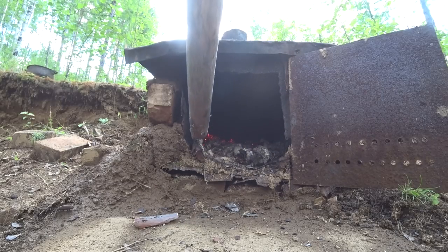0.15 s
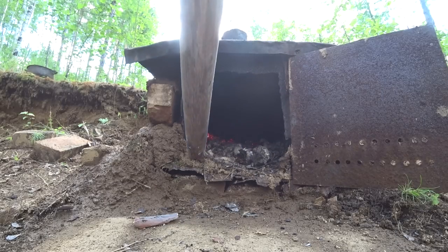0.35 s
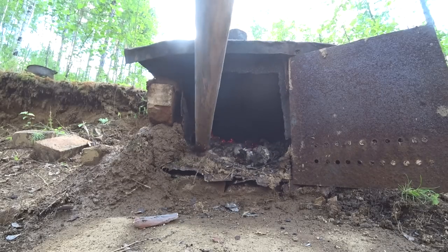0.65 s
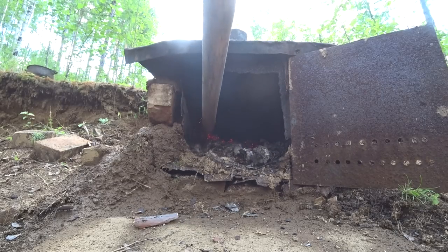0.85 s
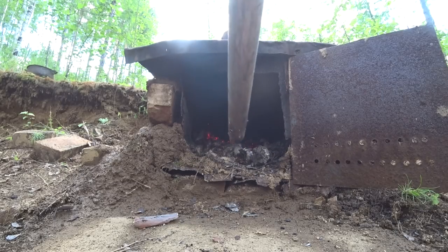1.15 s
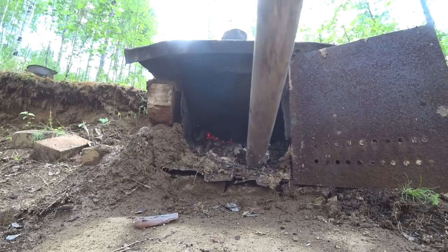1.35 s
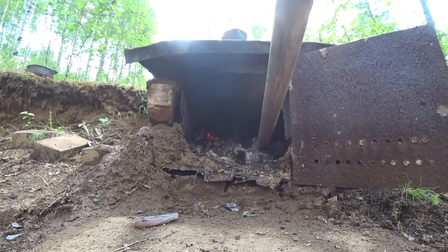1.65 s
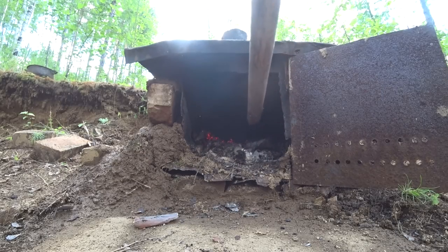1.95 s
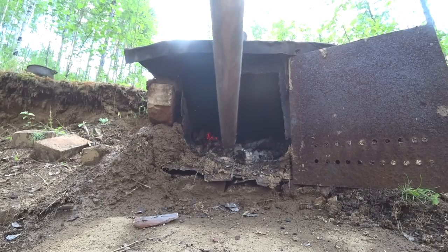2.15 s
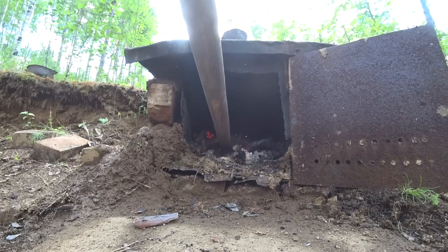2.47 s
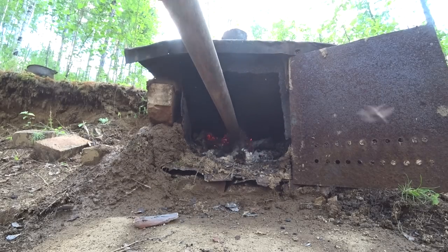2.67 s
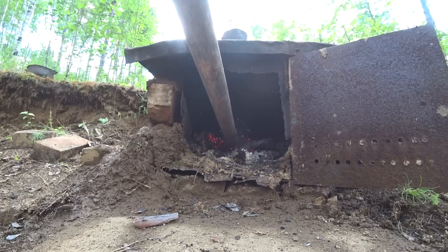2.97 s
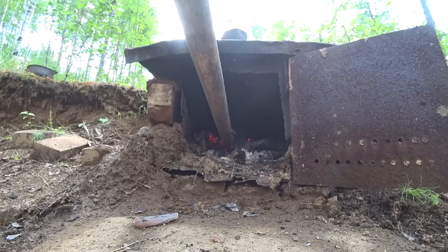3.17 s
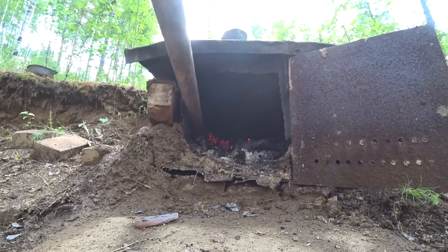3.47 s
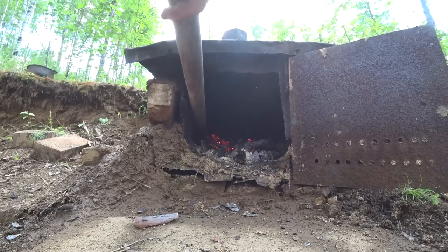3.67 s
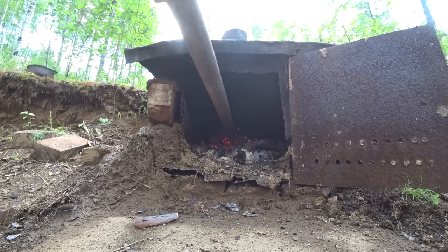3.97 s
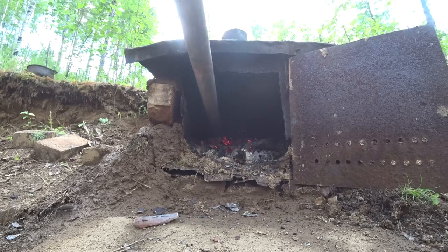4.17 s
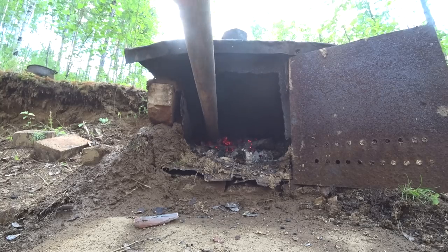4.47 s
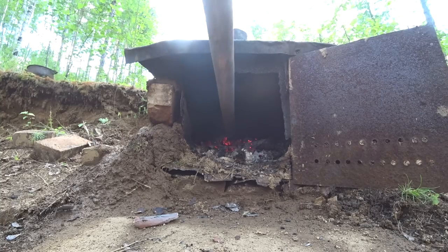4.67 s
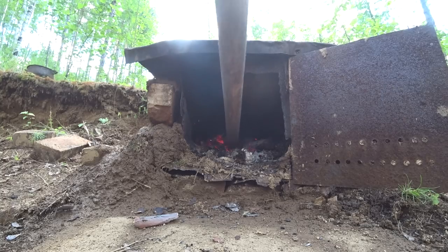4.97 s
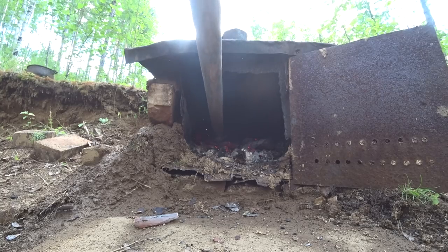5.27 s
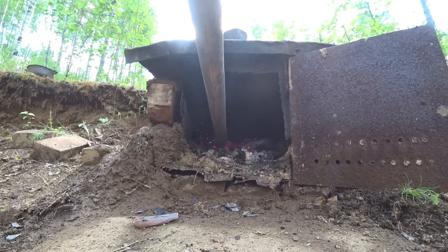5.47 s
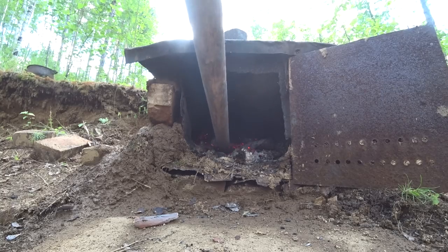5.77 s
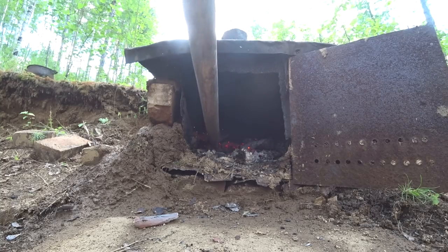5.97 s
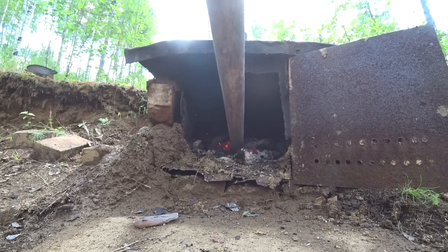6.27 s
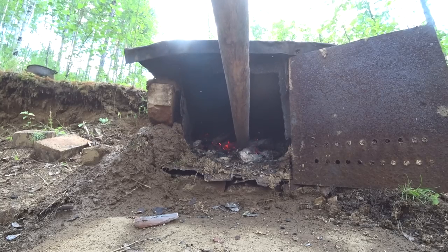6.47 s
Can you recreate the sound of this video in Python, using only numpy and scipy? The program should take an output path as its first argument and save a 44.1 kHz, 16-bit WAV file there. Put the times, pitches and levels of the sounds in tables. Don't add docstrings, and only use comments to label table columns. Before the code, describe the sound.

Close to an outdoor metal firebox, a wooden pole stirs charcoal. An early cluster of bright crunches gives way to lighter scraping, then a heavy jab thuds at about three and a half seconds. Dry snaps and ticks thicken afterwards, with more knocks and grit. A fly hums near the microphone before three seconds and again at the end, over quiet forest air.

```python
import sys
import numpy as np
from scipy import signal
from scipy.fft import rfft, irfft, next_fast_len
from scipy.io import wavfile
from scipy.ndimage import uniform_filter1d

SR = 44100
rng = np.random.default_rng(int(sys.argv[2]) if len(sys.argv) > 2 else 0)


def persist_wave(psi):
    counts = np.round(np.clip(psi, -1, 1) * 32767).astype(np.int16)
    wavfile.write(sys.argv[1], SR, np.atleast_2d(counts).T)


def gain_from_db(level_db):
    decades = np.asarray(level_db, float) / 20
    return 10 ** decades


N = 291942


def evened(x):
    return x / np.sqrt(np.mean(x ** 2) + 1e-20)


def peaked(x):
    return x / abs(x).max()


def read(points, hz):
    f, value = np.transpose(points)
    return np.interp(np.log(hz + 1), np.log(f + 1), value)


def add(mix, s, sound):
    part = mix[..., max(round(s * SR), 0):][..., :sound.shape[-1]]
    part += sound[..., :part.shape[-1]]


def colour(x, points):
    size = next_fast_len(N)
    gain = gain_from_db(read(points, np.fft.rfftfreq(size, 1 / SR)))
    return irfft(rfft(x, size) * gain, size)[:N]


def resonate(x, hz, width):
    hz = min(hz, 0.45 * SR)
    return signal.lfilter(*signal.iirpeak(hz, max(hz / width, 0.3), SR), x)


def body(x, modes):
    return evened(sum(gain_from_db(db) * resonate(x, hz, width) for hz, width, db in modes))


def puff(rise_s, t60):
    t = np.arange(5000) / SR
    return rng.standard_normal(5000) * (1 - np.exp(-t / rise_s)) * gain_from_db(-60 * t / max(t60, 0.004))


# pitch_hz, level_db (per Hz)
AIR_COLOUR = [(12, -30), (20, -3.5), (119, -16.5), (147, -16.5), (461, -15.5), (705, -18.5), (1450, -19.5),
              (2040, -27), (7720, -36), (11500, -39.5), (15000, -77), (22000, -120)]
# pitch_hz, likeness (-1 to 1)
AIR_LIKENESS = [(60, 0.99), (170, -0.056), (500, -0.71), (1420, -0.68), (4090, -0.42), (11800, 0.29)]


def air():
    level_db, gust_db, gust_below_hz = -55, 3.3, 60
    frames, hz = N // 256 + 5, np.fft.rfftfreq(1024, 1 / SR)
    a, b, c, d, patches = rng.standard_normal((frames, 513, 5)).T
    patches = evened(uniform_filter1d(uniform_filter1d(patches, 14, 0), 12, 1))
    same = np.clip(read(AIR_LIKENESS, hz), -1, 1)[:, None]
    left = a + 1j * b
    right = same * left + np.sqrt(1 - same ** 2) * (c + 1j * d)
    gusts = evened(uniform_filter1d(rng.standard_normal(frames), size=30))
    wind_db = gust_db * gusts / (1 + (hz[:, None] / gust_below_hz) ** 2)
    z = np.array([left, right]) * gain_from_db(read(AIR_COLOUR, hz)[:, None] + patches + wind_db)
    return gain_from_db(level_db) * evened(signal.istft(z, nperseg=1024, noverlap=768)[1][:, :N])


def insects():
    pitch_hz, width_hz, level_db = 7600, 520, -72
    own, shared = rng.standard_normal((2, N)), rng.standard_normal(N)
    once = resonate(own + shared, pitch_hz, width_hz)
    return gain_from_db(level_db) * evened(resonate(once, pitch_hz, width_hz))


# start_s, peak_db, pitch_hz,
# dull_under_bright_db
TICKS = [(0.0443, -38.5, 5900, -9), (0.272, -41, 6980, -22), (1.1173, -38.5, 3390, -12),
         (1.254, -34.5, 7040, -22), (1.4234, -42, 8080, -5), (1.5853, -38, 7220, -24),
         (1.6252, -33.5, 7700, -11), (1.9405, -36.5, 6840, -22), (1.9759, -34, 6030, -18),
         (2.002, -40, 7850, -25), (2.0453, -32.5, 6840, -27), (2.0583, -38, 7730, -26),
         (2.094, -43, 7100, -21), (2.2174, -43, 6920, -3), (2.9654, -33.5, 7800, -30),
         (3, -47, 7410, -21), (3.0054, -29, 6680, -26), (3.0679, -28, 10500, -25.5),
         (3.0827, -35, 7740, -20), (3.1137, -32, 7200, -22), (3.175, -33, 6450, -31),
         (3.209, -31.5, 6800, -28), (3.237, -35, 7010, -20), (3.2458, -31, 4100, -21),
         (3.258, -28, 6710, -15), (3.276, -28, 6760, -11), (3.2917, -29.5, 9200, -10),
         (3.3275, -38, 7740, -19), (3.345, -41.5, 9710, -24.5), (3.3818, -42, 7470, -17),
         (3.4022, -38.5, 7390, -22), (3.4241, -29.5, 6080, -29), (3.455, -35, 6800, -14),
              (4.171, -38, 7940, -26), (4.1885, -34.5, 6560, -29), (4.477, -22.5, 7170, -28),
              (4.6743, -32, 7870, -22), (4.6905, -25.5, 8100, -24), (4.802, -32, 8050, -30),
              (4.8302, -30.5, 6270, -22), (5.0893, -27, 6330, -29), (5.1791, -31.5, 8300, -33),
              (5.2021, -30.5, 9780, -27), (5.3998, -33, 8390, -25), (5.4085, -30, 8160, -16),
              (5.4267, -28, 7740, -18), (5.537, -46, 7840, -16), (5.5834, -35.5, 8000, -18),
              (5.6106, -44, 7910, -22), (5.6217, -42, 6170, -17), (5.6456, -36, 6150, -19),
              (6.0174, -34.5, 7490, -21), (6.08, -36, 7700, -24), (6.1649, -33, 8450, -9)]
# start_s, peak_db, pitch_hz, t60_s
BREAKS = [(0.4897, -31, 4700, 0.037), (0.579, -23.5, 7000, 0.037), (0.653, -22, 6820, 0.021),
            (0.7028, -14.5, 6040, 0.027), (0.8809, -33.5, 7400, 0.04), (0.891, -31, 4280, 0.025),
            (0.9216, -36, 5150, 0.055), (1.457, -32.5, 7600, 0.029), (1.5426, -31, 7140, 0.032),
            (1.6708, -25.5, 7500, 0.031), (1.7593, -22.5, 7100, 0.023), (2.5356, -28.5, 7600, 0.043),
            (3.5079, -13.5, 3380, 0.04), (3.6056, -14, 6100, 0.022), (3.743, -19, 5800, 0.023),
            (4.2651, -16, 6540, 0.032), (4.4378, -31, 7300, 0.027), (4.5424, -32, 7390, 0.037),
            (4.923, -21, 3730, 0.048), (5.015, -21, 7700, 0.018), (5.1012, -32, 7300, 0.091),
            (5.3488, -24.5, 5440, 0.03), (5.359, -17, 3670, 0.039), (5.8502, -21, 7250, 0.025),
            (5.866, -23.5, 7600, 0.038), (6.179, -31.5, 4300, 0.054), (6.375, -34, 7500, 0.024),
            (6.5942, -26.5, 4130, 0.018), (0.5346, -30.5, 7350, 0.038), (.611, -32, 6500, .02),
            (.6884, -23, 6860, .02), (0.6948, -15.5, 8030, 0.025), (0.711, -16.5, 9600, .04),
            (.737, -24, 8160, 0.046), (0.7694, -22.5, 7580, 0.024), (.787, -25.5, 8050, 0.038),
            (.8, -30, 7550, 0.042), (2.234, -30, 6000, .04), (3.5514, -26, 7390, .015),
            (3.5745, -20.5, 8440, 0.032), (3.616, -28, 7500, .04), (3.652, -35, 7000, 0.023),
            (3.771, -28, 6000, .02), (3.7906, -19.5, 6340, .03), (3.819, -24, 8500, 0.035),
            (3.846, -21, 7000, .04), (3.862, -22, 7500, .04),
            (2.2805, -24, 7000, 0.0096), (2.909, -31.5, 6000, .03), (3.031, -34, 6500, .09),
          (3.165, -42, 6000, 0.027), (3.215, -36, 6000, 0.022), (3.6098, -19, 6000, .015),
          (4.247, -28, 7300, 0.018), (5.9955, -22, 3550, 0.013), (6.502, -23, 3500, 0.012),
          (1.45, -40, 3400, .04), (1.506, -35, 3400, .04), (1.694, -40, 5000, .02), (1.717, -36, 4500, .03),
          (1.775, -35, 4200, .04), (2.949, -31, 6500, .012), (4.235, -42, 5500, .02),
          (4.257, -25, 7000, .05), (4.277, -24, 5500, .02), (4.45, -29, 7500, .015),
          (4.64, -40, 7000, .015), (5.678, -40, 6000, .02), (5.72, -32, 6500, .04),
          (5.838, -31, 9000, .015), (5.975, -37, 5000, .015)]
# start_s, peak_db, pitch_hz, t60_s, dull_under_bright_db
SNAPS = [(1.518, -24, 5050, 0.0089, -17), (2.273, -19, 9280, 0.0098, -21), (2.5927, -17, 6300, 0.01, -32),
         (2.6444, -23.5, 7370, 0.012, -21), (2.7472, -23.5, 6100, 0.01, -31),
         (2.927, -18.5, 7500, 0.012, -18), (2.9567, -23, 7790, 0.011, -31), (3.026, -20, 6680, 0.0098, -20),
         (3.197, -22.5, 6330, 0.0081, -27), (3.482, -23.5, 6800, 0.013, -17),
         (3.907, -20, 5900, 0.0084, -22), (3.9629, -23.5, 6650, 0.0067, -30),
         (4.0478, -22.5, 9850, 0.0065, -18), (4.0758, -23.5, 5950, 0.014, -14),
         (4.134, -18.5, 8500, 0.012, -19), (4.289, -19.5, 8080, 0.0093, -36),
         (4.317, -27, 7140, 0.015, -24), (4.3615, -15, 7800, 0.013, -30),
         (4.5014, -23.5, 10200, 0.013, -31), (4.5931, -16.5, 8300, 0.01, -36),
         (4.6085, -26.5, 6910, 0.014, -25), (5.2492, -23.5, 10900, 0.014, -28),
         (5.3134, -14.5, 8200, 0.015, -17.5), (5.3718, -21, 6470, 0.011, -13),
         (5.702, -18.5, 6600, 0.01, -20), (5.9947, -9.5, 8650, 0.013, -22.5),
         (6.4253, -26.5, 10800, 0.012, -22), (6.5024, -13.5, 6550, 0.01, -31),
         (6.552, -28.5, 8250, 0.016, -24)]


def coals():
    tick_t60_s, tick_spread, breaks_dull_db = 0.013, 0.13, -16.5
    ticks = TICKS
    chance = np.exp(tick_spread * rng.standard_normal(len(ticks)).clip(-2, 2))
    small = [(s, db, hz, tick_t60_s * b ** 2, dull_db) for (s, db, hz, dull_db), b in zip(ticks, chance)]
    breaks = [(*row, breaks_dull_db) for row in BREAKS]
    return breaks + SNAPS + small


def crackles():
    out = np.zeros((2, N))
    for s, db, hz, t60, dull_db in coals():
        steps = np.repeat(rng.standard_normal(250), 20)
        splinters = gain_from_db(3.5 * rng.standard_normal(5000) + 1.92 * steps)
        snap = splinters * puff(0.17 * t60, t60) + 0.068 * puff(0.0018, 0.019)
        snap[30:] += 1.6 * (0.012 / t60) ** 2 * puff(0.0002, 0.0045)[:-30]
        bright_hz = 3700 * gain_from_db(rng.normal(0, 0.56))
        bright = signal.lfilter(*signal.butter(3, bright_hz, "high", fs=SR), snap)
        dull = signal.lfilter(*signal.butter(2, [1100, 3200], "band", fs=SR), snap)
        pitched = 1.3 * bright + 2.38 * resonate(bright, hz, 0.18 * hz)
        sound = peaked(pitched) + gain_from_db(dull_db - 2.5) * peaked(dull)
        pan_db = rng.normal(1.0, 0.89)
        add(out, s, gain_from_db(db + np.array([[pan_db], [-pan_db]]) / 2) * sound)
    return out


# pitch_hz, width_hz, level_db
RING = [(440, 980, -1.5), (538, 115, -1.5), (1040, 30, 0.5), (1150, 300, -6), (1623, 99, 1),
        (2250, 330, 1.5), (2800, 500, 3.5), (3740, 90, -31)]
# start_s, peak_db, pitch_hz, t60_s
KNOCKS = [(.49, -36, 1060, 0.01), (0.658, -36.5, 1370, 0.025), (0.704, -31.5, 1390, 0.024),
          (.889, -31.5, 1854, 0.022), (1.462, -28.5, 1004, .022), (1.463, -32.5, 540, 0.028),
          (4.254, -44.5, 896, 0.043), (4.256, -38, 1410, .03), (1.544, -38, 423, 0.033),
          (1.653, -42.5, 423, 0.12), (1.761, -33.5, 410, 0.036), (2.238, -33, 2330, 0.043),
          (2.249, -33, 1010, 0.076), (3.51, -35, 464, 0.039), (3.791, -36.5, 750, 0.038),
          (3.84, -31.5, 1040, 0.074), (4.075, -45.5, 800, 0.032), (4.257, -37, 440, .04),
          (4.469, -44, 420, 0.043), (4.495, -38.5, 520, 0.026), (4.903, -39.5, 1150, 0.16),
          (4.922, -30, 1650, 0.057), (4.979, -37, 2280, 0.042), (5.35, -28.5, 606, 0.071),
          (5.36, -22, 2300, 0.033), (5.419, -40, 1710, 0.03), (5.69, -36, 1085, 0.044),
          (5.723, -35, 1106, 0.042), (5.95, -43, 904, 0.057), (5.965, -41, 1100, 0.049),
          (6.182, -30.5, 1085, 0.031), (6.593, -39.5, 432, 0.047), (2.233, -38, 1074, 0.044),
          (2.236, -36, 554, 0.066), (2.24, -35, 1610, 0.049), (2.249, -29.5, 2600, .03),
          (2.291, -36, 2610, .03), (2.393, -40, 2540, 0.029), (2.415, -39, 2250, 0.033),
          (2.467, -42, 2410, .025), (2.528, -37.5, 2770, 0.043), (2.56, -36, 2640, 0.034),
          (5.352, -27, 1770, 0.022), (5.35, -33, 1120, 0.041), (6.15, -49, 590, 0.05),
          (6.184, -40, 606, 0.055), (6.185, -38.5, 1710, 0.04), (6.208, -41, 430, .03),
          (6.502, -40.5, 1800, 0.02), (.672, -39, 330, 0.027)]
# start_s, peak_db, pitch_hz
THUMPS = [(0.489, -40, 206), (0.66, -43, 110), (1.462, -34.5, 211), (1.653, -37, 130), (1.718, -43, 230),
          (1.761, -38.5, 166), (2.255, -49, 67.4), (3.51, -16.5, 137), (3.511, -25, 282), (3.79, -36, 152),
          (3.841, -33.5, 149), (4.074, -45.5, 118), (4.259, -33, 106), (4.252, -39, 290), (4.468, -38, 110),
          (4.495, -51, 290), (4.904, -42.5, 240), (4.976, -45, 96), (5.204, -48, 294), (5.35, -30.5, 147),
          (5.362, -29.5, 310), (5.721, -40, 112), (5.947, -44.5, 193), (6.2, -49, 74), (6.596, -45, 111)]


def knocks():
    thump_cycles = 10
    out, t = np.zeros(N), np.arange(5000) / SR
    for s, db, hz, t60 in KNOCKS:
        blow = puff(0.0055, t60)
        swell = (1 - np.exp(-t / 0.00096)) ** 2
        note = np.sin(2 * np.pi * hz * t) * swell * gain_from_db(-60 * t / max(t60, 0.01))
        dull = signal.lfilter(*signal.butter(3, 1.3 * hz + 500, fs=SR), blow)
        clack = 0.56 * peaked(note) + 0.08 * peaked(dull) + 0.3 * peaked(body(dull, RING))
        add(out, s - 0.001, gain_from_db(db) * peaked(clack))
    for s, db, hz in THUMPS:
        push = np.sin(2 * np.pi * hz * t) * (1 - np.exp(-t / 0.0035)) * gain_from_db(-60 * t * hz / thump_cycles)
        add(out, s - 0.001, gain_from_db(db) * peaked(push))
    return out


# full_pressure_s, hold_s, grit_db, ring_over_grit_db, thud_over_grit_db
DRAGS = [(0.532, 0.13, -47, -2, -8), (0.703, 0.0042, -34.5, -8.5, -5.5), (0.791, 0.016, -43, -13.5, -6),
         (0.832, 0.066, -53.5, -13, -2), (1.48, 0.061, -50, 0.5, -2.5), (1.67, 0.0043, -49, -3, 2.5),
         (1.765, 0.019, -49, -8.5, -3), (2.264, 0.32, -47.5, -1.5, -3.5), (2.627, 0.28, -52.5, -25, -6),
         (3.046, 0.02, -52, -4, -5), (3.198, .01, -58.5, -4.5, -13), (3.588, 0.32, -40.5, -13.5, -1.5),
         (3.605, 0.013, -35, -27, -23), (3.81, 0.074, -35.5, -8.5, -10), (4.44, 0.047, -43.5, -8, -6.5),
         (5.229, 0.012, -49.5, -26, 0.5), (5.715, .015, -48, -2, -3), (5.797, 0.022, -46.5, -1.5, -5),
         (5.844, 0.066, -44.5, -9.5, -5.5), (5.91, 0.03, -47, -2, -8), (6.257, 0.075, -46, -7.5, -6),
         (6.373, 0.054, -52.5, -6.5, -9), (6.463, 0.028, -52, -13, -4), (6.59, .03, -50.5, -0.5, 2.5)]
# start_s, fall_20db_s, grit_db, ring_over_grit_db, thud_over_grit_db
JABS = [(1.69, 0.5, -57.5, -7, 1.5), (2.231, 0.92, -45, -5, -17), (3.505, 0.1, -28.5, -7, -2),
        (3.94, 0.33, -48.5, -14, -4.5), (4.256, 0.3, -39, -18.5, -2), (4.52, 0.24, -56.5, -26, -11),
        (4.898, 0.19, -37.5, -2, -2.5), (4.98, 0.22, -41.5, -11.5, -3.5), (5.347, 0.1264, -42.5, -3.5, 2),
        (5.41, 0.15, -64.5, -14, -11), (5.689, 0.1, -43, -3, -2.5), (5.99, 0.54, -55.5, -4.5, -2)]


def pressure():
    lean_in_db_per_s, let_go_db_per_s, bite_s = 395, 329, 0.0074
    t = np.linspace(0, N / SR, num=6000)
    s, hold, *drag_db = np.transpose(DRAGS)[:, :, None]
    lean_in_db = -lean_in_db_per_s * (s - t).clip(0)
    let_go_db = -let_go_db_per_s * (t - s - hold).clip(0)
    drags = gain_from_db(lean_in_db + let_go_db)
    s, fall, *jab_db = np.transpose(JABS)[:, :, None]
    jabs = np.clip((t - s) / bite_s, 0, 1) * gain_from_db(-20 * (t - s).clip(0) / fall)
    grit_db, ring_db, thud_db = np.concatenate([drag_db, jab_db], axis=1)
    levels = gain_from_db([grit_db, grit_db + ring_db, grit_db + thud_db])
    power = (np.concatenate([drags, jabs]) * levels) ** 2
    return [np.interp(np.arange(N) / SR, t, np.sqrt(p.sum(axis=0))) for p in power]


def grains(per_s, spread_db, ms):
    size = gain_from_db(spread_db * np.minimum(rng.exponential(1, N), 5)) * (rng.random(N) < per_s / SR)
    shape = np.exp(-np.arange(900) / SR * 1000 / ms)
    power = signal.oaconvolve(size ** 2, shape)[:N].clip(0)
    return evened(np.sqrt(power) * rng.standard_normal(N))


def patchy(x, patch_db):
    z = signal.stft(x, nperseg=256)[2]
    patches = uniform_filter1d(rng.standard_normal(z.shape), size=9, axis=0)
    patches = evened(uniform_filter1d(patches, size=5, axis=1))
    return signal.istft(z * gain_from_db(patch_db * patches), nperseg=256)[1][:N]


# pitch_hz, level_db (per Hz)
GRIT = [(880, -26), (1500, -15), (2940, -14.5), (3580, -2), (5070, -2), (6070, 3), (10600, -3.5),
        (11200, -8), (11500, -20), (15000, -55), (22000, -120)]
# pitch_hz, width_hz, level_db
THUD = [(118, 62, 13), (197, 49, -3), (283, 79, -5.5)]


def raking():
    grit_level, ring_level, thud_level = pressure()
    clumps = gain_from_db(1.2 * evened(uniform_filter1d(rng.standard_normal(N), 300)))
    crumbs = grains(1800, 1.7, 3) + 0.4 * grains(400, 2.8, 0.5)
    grit = evened(clumps * colour(crumbs, GRIT))
    grit = evened(patchy(grit, 2.6))
    lumps = sum(gain_from_db(db) * evened(resonate(grains(170, 2.8, 3.1), hz, width)) for hz, width, db in RING)
    rattle = evened(resonate(grains(1600, 2.8, 1.6), 1410, 2300))
    ring = evened(evened(lumps) + 1.14 * rattle)
    thud = body(grains(300, 1.8, 8), THUD)
    thud = signal.lfilter(*signal.butter(2, 85, "high", fs=SR), thud)
    return grit_level * grit + ring_level * ring + thud_level * thud


# pitch_hz, side_db
BOX_WIDTH = [(60, -22), (140, -22), (350, -19), (840, -14), (2020, -10), (4880, -11.5), (11800, -12.5)]


def firebox(x):
    t = np.arange(3000) / SR
    t60_s = np.array([[0.07], [0.03]])
    tails = rng.standard_normal((2, 3000)) * gain_from_db(-60 * t / t60_s) * (t > 0.0008)
    tails /= np.linalg.norm(tails, axis=1)[:, None]
    mid, side = signal.oaconvolve(x[None], tails, axes=1)[:, :N]
    scatter = evened(uniform_filter1d(rng.standard_normal(N), 180))
    side = colour(0.61 * side + 0.75 * scatter * x, BOX_WIDTH)
    return x + gain_from_db(-15.5) * mid + np.array([side, -side])


# time_s, wingbeat_hz,
# second_partial_db, facing_db
FLY_FIRST = [
    (2.3, 210.2, -60, 2),
    (2.335, 216, -53.5, 5.5),
    (2.38, 207.1, -65, -9),
    (2.45, 207, -67, -5),
    (2.565, 205.6, -54.5, 4),
    (2.655, 182, -60, 0),
    (2.69, 221.4, -58, -25),
    (2.74, 210.5, -67, -17),
    (2.8, 217, -67, -4),
]
FLY_SECOND = [
    (6.08, 205.6, -76, 6),
    (6.12, 211.5, -63.5, 0),
    (6.235, 208.4, -61, -4),
    (6.286, 211.8, -54, -10.5),
    (6.324, 212.3, -56.5, -0.5),
    (6.345, 226, -52.5, -16),
    (6.385, 212, -58.5, -20),
    (6.425, 235.7, -47, -1),
    (6.46, 218.4, -68, 2),
]
FLY_SECOND_END = [
    (6.46, 217.5, -84, 7),
    (6.48, 218.6, -48.5, 7),
    (6.499, 225.3, -50.5, 2),
    (6.521, 209, -54, 3),
    (6.54, 229.7, -51.5, 5),
    (6.56, 218, -60, 11),
    (6.58, 223.7, -52, -4),
    (6.62, 212, -60, -1),
]
# multiple, under_second_partial_db
WING = [(3, -11), (4, -12.5), (5, -11.5), (6, -14), (7, -16)]


def fly(rows):
    s, *columns = np.transpose(rows)
    t = np.arange(s[0], s[-1], 1 / SR)
    hz, second_db, facing_db = (np.interp(t, s, c) for c in columns)
    waver, flutter = (evened(uniform_filter1d(row, 350)) for row in rng.standard_normal((2, len(t))))
    turn = 2 * np.pi * np.cumsum(hz * (1 + 0.017 * waver)) / SR
    upper = np.sin(2 * turn) + sum(gain_from_db(db) * np.sin(k * turn + k * k) for k, db in WING)
    first = gain_from_db(second_db + facing_db) * np.sin(turn)
    buzz = first + gain_from_db(second_db + 2.5 * flutter) * upper
    return s[0], np.sqrt(2) * buzz * signal.windows.tukey(len(t), 0.06)


def scene():
    flies, snaps = np.zeros(N), crackles()
    for rows in (FLY_FIRST, FLY_SECOND, FLY_SECOND_END):
        add(flies, *fly(rows))
    snaps_mid = snaps.mean(0)
    near = firebox(knocks() + raking() + snaps_mid) + snaps - snaps_mid
    return near + flies * gain_from_db(np.array([[-1.5], [1.5]])) + air() + insects()


def low_pass(x):
    return signal.sosfilt(signal.butter(12, 12360, fs=SR, output="sos"), x)


def record(dry):
    taps = signal.firwin(255, 11140, window=("kaiser", 3.6), fs=SR)
    mix = signal.oaconvolve(dry, taps[None], "same")
    return low_pass(mix)


dry = scene()
out = record(dry)
persist_wave(out)
```